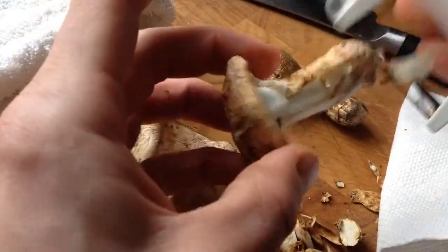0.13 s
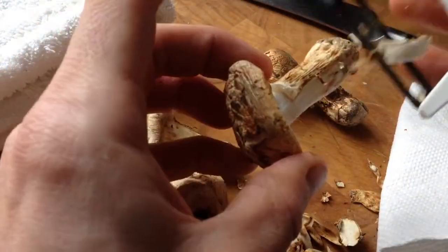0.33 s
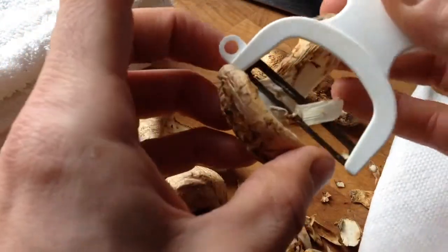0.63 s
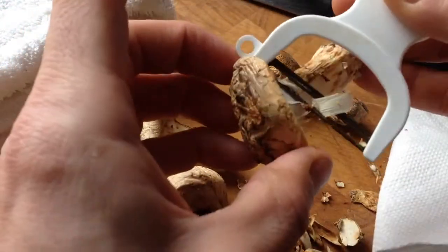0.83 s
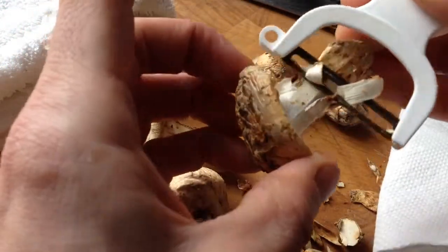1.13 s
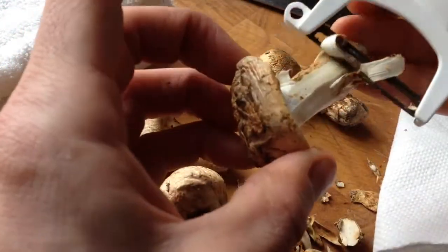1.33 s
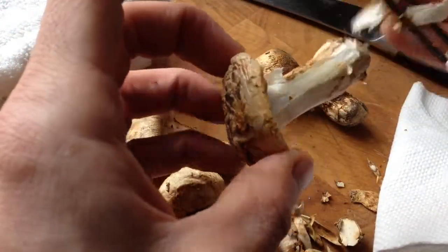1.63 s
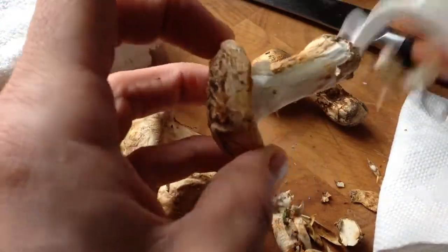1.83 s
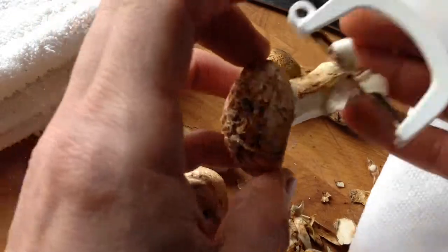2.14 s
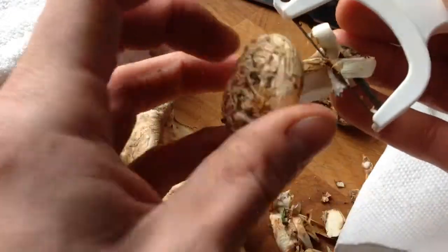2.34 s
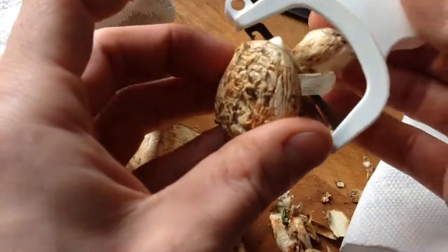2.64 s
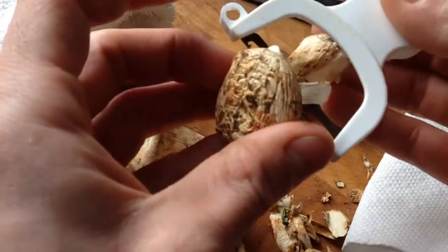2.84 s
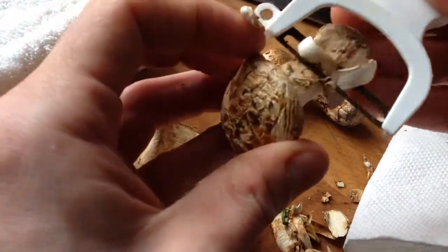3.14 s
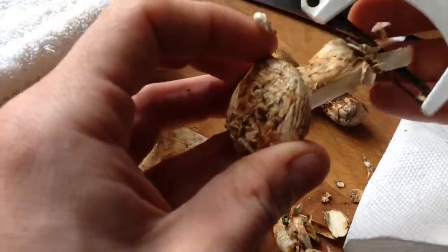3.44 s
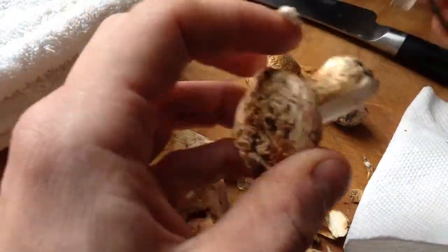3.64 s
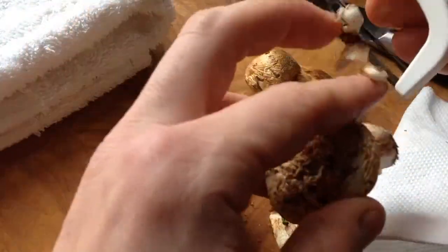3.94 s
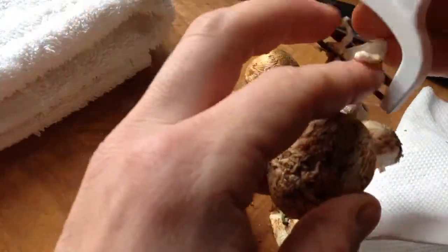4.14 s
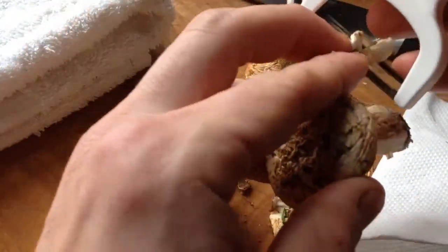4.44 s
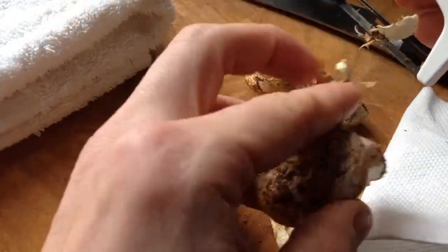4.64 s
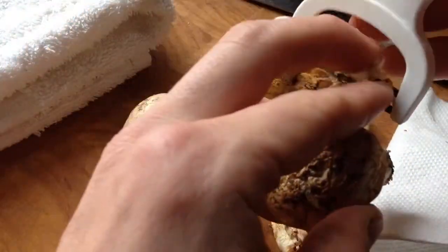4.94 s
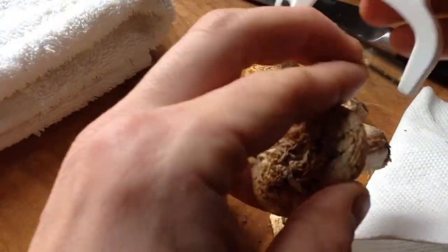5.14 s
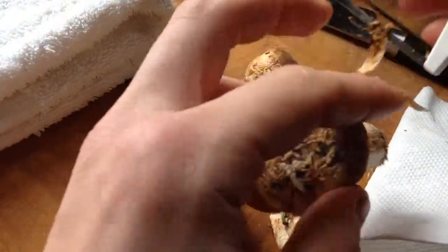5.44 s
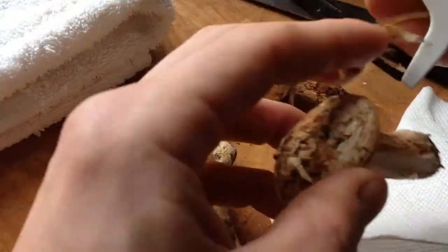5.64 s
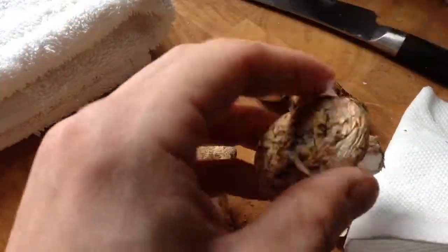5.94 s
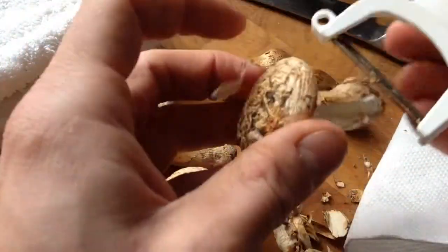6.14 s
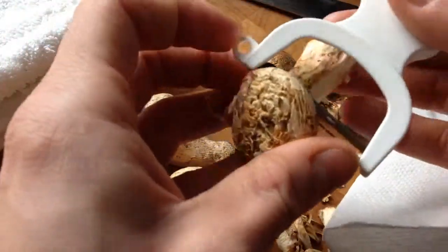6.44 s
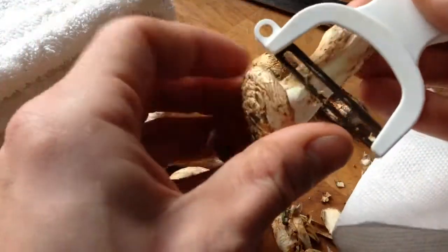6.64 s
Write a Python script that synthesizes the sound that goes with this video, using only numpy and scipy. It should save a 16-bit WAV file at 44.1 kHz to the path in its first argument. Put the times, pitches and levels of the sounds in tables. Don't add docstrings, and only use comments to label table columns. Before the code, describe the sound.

Close and dry, a loose peeler blade clicks crisply in its plastic frame between brief, papery strokes through mushroom skin. The loudest snaps come near the start, at four seconds and after six, with quieter ticks and tiny crackles scattered unevenly between them. Fingers rustle lightly on the cap. Behind is a small kitchen with a low appliance drone, dull rumble and faint air hiss.

```python
import sys
import numpy as np
from scipy import signal
from scipy.fft import rfft, irfft, next_fast_len
from scipy.io import wavfile
from scipy.ndimage import uniform_filter1d

SR = 44100
rng = np.random.default_rng(int(sys.argv[2]) if len(sys.argv) > 2 else 0)


def wav_out(sig):
    wavfile.write(sys.argv[1], SR, np.round(np.clip(np.atleast_2d(sig).T, -1, 1) * 32767).astype(np.int16))


def volts_from_decibels(level):
    exponent = np.asarray(level, float) / 20
    return 10 ** exponent


N = 299439

# pitch_hz, level_db (per Hz)
AIR_COLOUR = [(15, -50), (25, -19), (84, -12.5), (134, -3), (206, -2), (354, -3), (624, -12), (818, -10.5),
              (1330, -14.5), (1480, -18), (1610, -13), (2910, -20), (3430, -19), (14400, -25), (16000, -24)]
# time_s, level_db
APPLIANCE_LULL = [
    (0, 1),
    (1.0, 0),
    (1.2, -4),
    (1.35, -6),
    (1.45, -11),
    (1.58, -6),
    (1.7, 1.5),
    (6.79, 2.5),
]
# middle_s, length_s, level_db
DRONE_SWELLS = [(.04, 0.061, -49), (.18, 0.14, -53), (0.414, 0.29, -56), (0.65, 0.48, -57.5),
                (0.996, 0.18, -58), (1.33, .14, -65), (1.67, 0.16, -55.5), (1.86, 0.27, -54),
                (2.255, 0.17, -52), (2.51, 0.36, -52), (2.77, .14, -53), (2.94, .16, -56),
                (3.223, 0.67, -58), (3.544, 0.075, -53), (3.704, 0.082, -52), (3.863, 0.11, -50.5),
                (3.998, .18, -61.5), (4.157, 0.095, -54), (4.344, 0.091, -52.5), (4.46, 0.27, -57),
                (4.63, .1, -54.5), (4.775, 0.2, -53), (4.98, 0.35, -56.5), (5.245, 0.25, -52),
                (5.513, 0.22, -53), (5.695, 0.091, -49), (5.87, 0.34, -52.5), (6.087, 0.11, -49),
                (6.37, 0.64, -58.5), (6.742, 0.095, -46.5)]
# pitch_hz, width_hz, level_db
CABINET = [(118.8, 5.4, -72), (274, 14, -68), (316.7, 12.4, -69.5), (359, 19.7, -64), (414, 20, -72),
           (491, 26, -85), (1466, 23, -74), (2200, 470, -71.5), (814, 42, -80)]
# time_s, level_db
RUMBLE_CURVE = [(0.0, -73), (0.36, -68), (1.8, -78), (1.83, -70), (2.02, -84), (2.12, -68.5), (4.76, -75),
                (4.82, -64), (4.93, -71), (6.5, -70), (6.75, -64), (6.79, -82)]
# time_s, level_db
FINGER_RUSTLE = [
    (0.0, -52),
    (0.21, -77),
    (0.76, -66),
    (2.5, -68.5),
    (3.27, -62),
    (3.72, -67),
    (6.0, -66),
    (6.52, -61),
    (6.79, -68),
]
# start_s, length_ms, friction_db
SKIN_STROKES = [(0, 9.6, -59), (0.033, 16, -55), (1.73, 26, -66), (1.8, 140, -67), (1.97, 48, -69),
                (2.02, 290, -81), (2.29, 44, -59.5), (2.55, 150, -65), (2.93, 25, -70), (3.018, 66, -59),
                (3.191, 41, -59), (3.43, 51, -59), (3.465, 37, -54), (3.554, 42, -53), (3.66, 57, -65),
                (4.17, 57, -68), (4.89, 28, -59.5), (4.963, 47, -57), (5.48, 40, -65.5), (6.395, 67, -57.5),
                (6.48, 85, -64.5), (6.62, 76, -66.5), (6.689, 47, -65)]
# start_s, length_ms, friction_db
BRUSH_STROKES = [(.26, 40, -69), (.52, 58, -73), (1.0, 34, -68), (1.22, 53, -68), (1.27, 90, -74),
                 (1.47, 97, -64.5), (1.54, 115, -63.5), (2.39, 45, -72), (2.67, 34, -68), (5.6, 110, -78),
                 (5.95, 65, -72), (6.35, 74, -67)]
STEM_SQUEAK = (2210, 2840)
# start_s, strength_db, place, focus_db, chatter_ms
BLADE_SNAPS = [(0.0334, -51.0, 2.4, 0, 13), (0.0457, -48, 0.56, 0.5, 14), (0.2512, -16.5, 2.13, 3.5, 7.6),
               (0.2576, -40, 3.1, 1.0, 9.5), (0.3463, -28.5, 2.17, 7, 7.2), (0.35, -34, 1.8, 4, 3.7),
               (0.3595, -41.5, 1.4, 9, 9.4), (0.6864, -37, 1.94, 7.5, 5.4), (1.6046, -45.5, 1.3, 2, 13),
               (2.6627, -36, 1.5, 8, 6.7), (2.6698, -41, 1.85, 3.5, 5), (3.0501, -58, 0.44, 0, 16),
               (3.56, -48, 0.9, 2, 11), (3.5813, -39, 1.6, 7, 6.6), (3.5887, -37, 2.04, 2.5, 6.3),
               (3.9342, -34.5, 1.62, 7.5, 6.9), (4.0424, -22, 3.44, 1.5, 5.4),
               (5.9778, -43.5, 1.4, 2.5, 15), (6.331, -48, 1.3, 6.0, 14), (6.3422, -23, 2.6, 2.5, 5.4),
               (6.3476, -38.5, 3.4, 2.0, 13), (2.408, -55, 1.7, 6, 15), (3.4696, -61, 0.2, 0, 11),
               (2.849, -53, 3.1, 1.5, 12)]
# start_s, strength_db, place, focus_db
BLADE_TICKS = [(0.2082, -48.5, 1.5, 9), (0.239, -55, 1.5, 2), (0.3283, -52, 1.5, 5), (0.339, -49, 1.0, 1),
               (0.3934, -55.0, 1.4, 6), (0.399, -48.0, 1.3, 6.0), (0.404, -52, 1.2, 6),
               (0.667, -55, 0.8, 7), (1.561, -52, 2, 5), (1.582, -51, 0.0, 5), (1.6117, -48, 4, 2),
               (1.7232, -51, -1.5, 0.5), (1.925, -49, 1.7, 11), (1.9453, -47.5, 3, 0.5),
               (2.033, -54.0, 2.2, 4.0), (2.306, -41.5, 1.8, 10), (2.561, -54, 1.6, 2.5),
               (2.786, -50, 3.5, 6), (3.2128, -54, 0.0, 0.5), (3.4794, -55, 3, 0), (3.6093, -51.0, 1.0, 6),
               (3.6954, -51, 2.0, 1), (3.7063, -48, 4, 1.5), (3.7417, -47.5, 2.06, 2.5),
               (4.9887, -51.5, 1.2, 1), (5.4132, -45.0, 1.7, 7.5), (5.7463, -53.5, 0.8, 0.5),
               (6.2356, -48.5, 3.5, 2), (6.4285, -42.5, 1.1, 10), (6.446, -50, 1.1, 2)]
# start_s, strength_db, place
FAINT_TICKS = [(0.5425, -62.0, 1.3), (1.017, -56, 1.8), (1.245, -63, 2), (1.592, -56.0, 1.7),
               (1.65, -59, 2.7), (1.711, -60.0, 2.2), (1.7465, -53, 0.98), (1.855, -58, 1.2),
               (1.899, -53.5, 1), (1.997, -55, 0.86), (2.0646, -56, 0.9), (2.1466, -54.5, 1.5),
               (2.5694, -57, 1.4), (2.943, -54, 0.37), (3.068, -56.0, 1.9), (3.5745, -50.0, 1.5),
               (4.187, -57.0, 0.7), (4.208, -55, 0.89), (4.7163, -59, 3.1), (4.9049, -53, 2),
               (4.972, -50, 0.59), (4.993, -50.0, 1.2), (5.224, -55, 0.71), (5.7757, -55.5, 1.3),
               (5.967, -56, 1.2), (6.0053, -56.0, 0.5), (6.4117, -51, 1.8), (6.547, -55.0, 0.9),
               (6.592, -57, 2.8), (6.637, -56, 0.74)]
# pitch_hz, ...
PART_MODES = [
    (1630, 2260, 2320, 2430, 2630),
    (2990, 3450, 3720, 4040, 4720, 5050),
    (5350, 5880, 6510, 7310, 7160, 8010),
    (9530, 10000, 10770, 11700, 12000, 13100, 14500),
]
PART_DECAY = (0.0025, 0.0044, 0.0051, 0.0021)


def rms_one(x):
    return x / np.sqrt(np.mean(x ** 2) + 1e-20)


def in_time(rows):
    return np.interp(np.arange(N) / SR, *np.transpose(rows))


def band(x, low_hz, high_hz):
    return signal.sosfilt(signal.butter(2, [low_hz, high_hz], "band", fs=SR, output="sos"), x)


def resonance(hz, width_hz):
    r = np.exp(-np.pi * width_hz / SR)
    noise = rng.standard_normal(N + SR)
    ringing = signal.lfilter([1, 0, -1], [1, -2 * r * np.cos(2 * np.pi * hz / SR), r * r], noise)
    return rms_one(ringing[SR:])


def grains(shape, per_s, spread_db):
    sizes = volts_from_decibels(spread_db * np.minimum(rng.exponential(1, shape), 4))
    sizes *= rng.choice([-1, 1], shape)
    return sizes * (rng.random(shape) < per_s / SR)


def room_air():
    size = next_fast_len(N)
    hz = np.arange(1, size // 2 + 2) * SR / size
    points_hz, points_db = np.transpose(AIR_COLOUR)
    colour = volts_from_decibels(np.interp(np.log(hz), np.log(points_hz), points_db))
    noise = irfft(rfft(rng.standard_normal(size)) * colour, size)[:N]
    air = volts_from_decibels(-58) * rms_one(noise)
    low_band = signal.butter(3, [85, 215], "band", fs=SR, output="sos")
    low = signal.sosfiltfilt(low_band, air)
    return air + low * (volts_from_decibels(in_time(APPLIANCE_LULL)) - 1)


def rumble():
    return volts_from_decibels(in_time(RUMBLE_CURVE) - 0.5) * rms_one(band(rng.standard_normal(N), 42, 86))


def swells():
    t = np.arange(N) / SR
    rest_db = -69 + in_time(APPLIANCE_LULL)
    power = volts_from_decibels(2 * rest_db)
    for middle_s, length_s, db in DRONE_SWELLS:
        power = power + volts_from_decibels(2 * db) * np.exp(-((t - middle_s) / (0.23 * length_s)) ** 2)
    return np.sqrt(power)


def appliance():
    drone = band(resonance(142.2, width_hz=5.7), 112, 186)
    drone /= np.sqrt(uniform_filter1d(drone ** 2, size=5000) + 0.17 * np.mean(drone ** 2))
    cabinet = sum(volts_from_decibels(db) * resonance(hz, width_hz) for hz, width_hz, db in CABINET)
    return swells() * drone + cabinet


def kitchen_tail(x):
    decay_s, wall_s, tail_db = 0.17, 0.008, -18
    t = np.arange(SR // 2) / SR
    noise = rng.standard_normal((2, len(t)))
    tail = band(noise[0], 500, 5700) * volts_from_decibels(-60 * t / decay_s)
    tail += 0.75 * band(noise[1], 5600, 14400) * volts_from_decibels(-60 * t / (0.94 * decay_s))
    tail *= np.clip(t / wall_s, 0, 1) ** 2
    tail /= np.sqrt(np.sum(tail ** 2))
    wander = 0.3 * np.cumsum(uniform_filter1d(rng.standard_normal(N), size=20))
    all_round = np.real(signal.hilbert(x, next_fast_len(N))[:N] * np.exp(1j * wander))
    return volts_from_decibels(tail_db) * signal.fftconvolve(all_round, tail)[:N]


def stroke_levels(bright):
    in_skin_db, brush_db = -4.5, 0.5
    level = np.zeros(N)
    for strokes, bright_db in ((SKIN_STROKES, in_skin_db), (BRUSH_STROKES, brush_db)):
        for start_s, length_ms, friction_db in strokes:
            span = slice(int(start_s * SR), int((start_s + length_ms / 1000) * SR))
            shape = signal.windows.tukey(len(level[span]), 0.55)
            level[span] += volts_from_decibels(friction_db + bright * bright_db + 1.0) * shape
    return level


def scrapes():
    grip = rms_one(band(rng.standard_normal(N), 35, 460))
    slips = grains(N, per_s=3500, spread_db=3.5) * volts_from_decibels(2.5 * grip)
    flesh = band(slips, 2050, 6000)
    for hz in STEM_SQUEAK:
        flesh += 0.56 * band(slips, hz - 130, hz + 130)
    metal = band(slips, 8200, 14000)
    strokes = stroke_levels(bright=0) * rms_one(flesh) + stroke_levels(bright=1) * rms_one(metal)
    rustle = volts_from_decibels(in_time(FINGER_RUSTLE) - 7.5) * rms_one(band(slips, 1940, 4440))
    return strokes + rustle


def ring_part(modes_hz, decay_s, level_db, place, focus_db, push):
    t = np.arange(push.shape[1]) / SR
    shape = (len(push), len(modes_hz))
    hz = np.array(modes_hz) * (1 + 0.025 * rng.standard_normal(shape))
    strength = volts_from_decibels(0.84 * rng.standard_normal(shape))
    mode_place = np.maximum(np.log(hz / 2200) / np.log(1.74), -0.5)
    strength *= volts_from_decibels(-focus_db * (mode_place - place) ** 2)
    tones = np.sin(2 * np.pi * hz[..., None] * t)
    body = np.einsum("em,emt->et", strength, tones) * volts_from_decibels(-60 * t / decay_s)
    blows = grains(push.shape, per_s=7900, spread_db=3.5)
    blows = push * (blows + 0.19 * rng.standard_normal(push.shape))
    blows[:, 44] += 4.5
    rung = signal.fftconvolve(blows, body, axes=1)[:, :len(t)]
    rung = band(rung, 0.66 * min(modes_hz), 0.98 * max(modes_hz))
    loudest = np.sqrt(uniform_filter1d(rung ** 2, size=110, axis=1).max(axis=1))
    return rung * (volts_from_decibels(level_db - 0.5) / loudest)[:, None]


def ticks():
    contacts = list(BLADE_SNAPS)
    contacts += [(*row, 6.7) for row in BLADE_TICKS]
    contacts += [(*row, 5, 6.4) for row in FAINT_TICKS]
    start_s, strength_db, place, focus_db, chatter_ms = np.array(contacts).T[:, :, None]
    t, chatter_s = np.arange(1024) / SR, chatter_ms / 1000
    push = np.minimum(t / 0.00097, 1) ** 2 * volts_from_decibels(-19 * t / chatter_s)
    push *= t < 1.15 * chatter_s
    parts_db = [(strength_db - focus_db * (part - place) ** 2)[:, 0] for part in range(len(PART_MODES))]
    parts = list(zip(PART_MODES, PART_DECAY, parts_db))
    parts.append(((710, 917, 1340), 0.015, parts_db[0] - 7))
    sound = sum(ring_part(*part, place, focus_db, push) for part in parts)
    out = np.zeros(N + len(t))
    first = ((start_s - 0.0007) * SR).astype(int)
    np.add.at(out, first + np.arange(len(t)), sound)
    return out[:N]


def scene():
    background = room_air() + rumble() + appliance()
    peeler = scrapes() + ticks()
    return (background + kitchen_tail(peeler) + peeler)[None]


def roll_off(x):
    return signal.sosfilt(signal.butter(12, 16530, fs=SR, output="sos"), x)


def record(dry):
    top_cut = signal.cheby2(16, 33, 15560, fs=SR, output="sos")
    mix = signal.sosfilt(top_cut, dry)
    return roll_off(mix)


dry = scene()
out = record(dry)
wav_out(out)
```